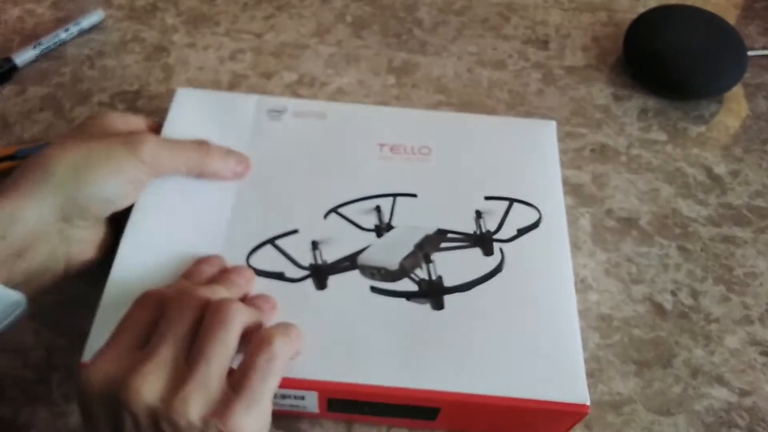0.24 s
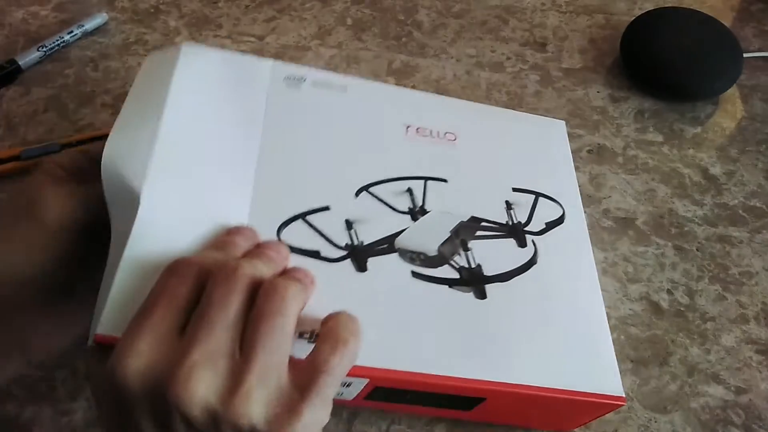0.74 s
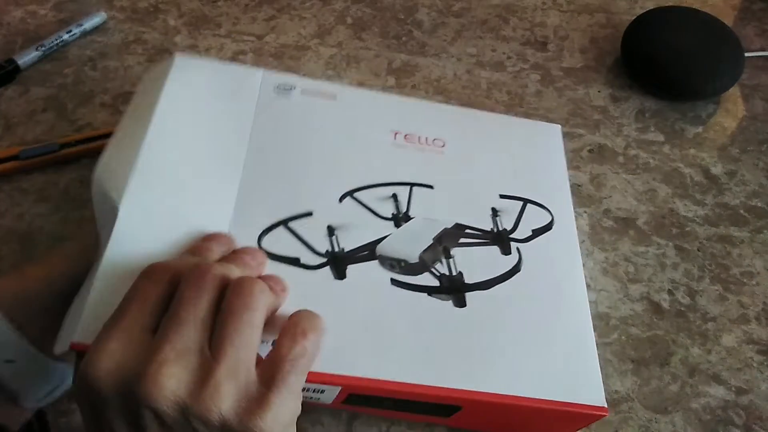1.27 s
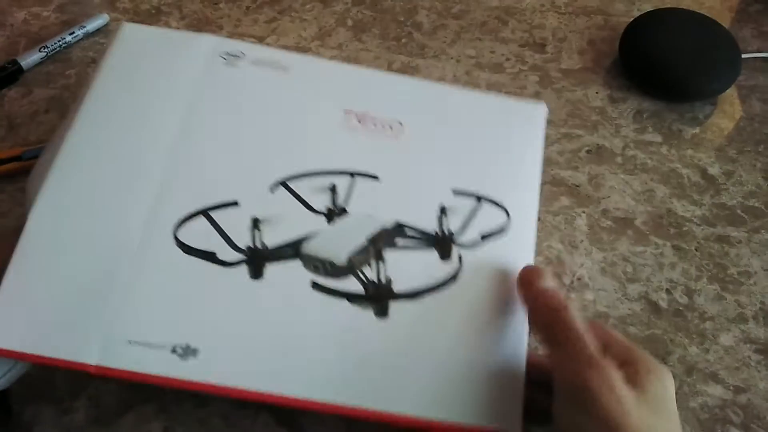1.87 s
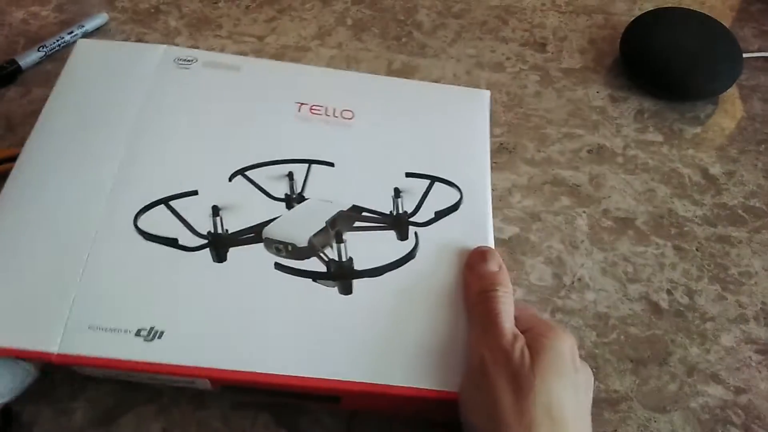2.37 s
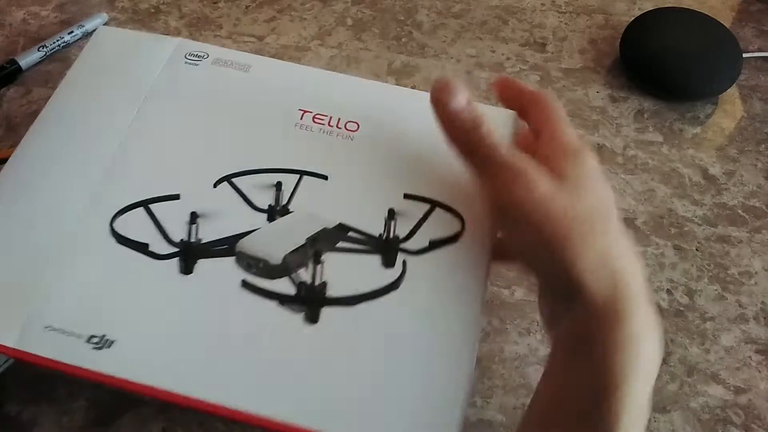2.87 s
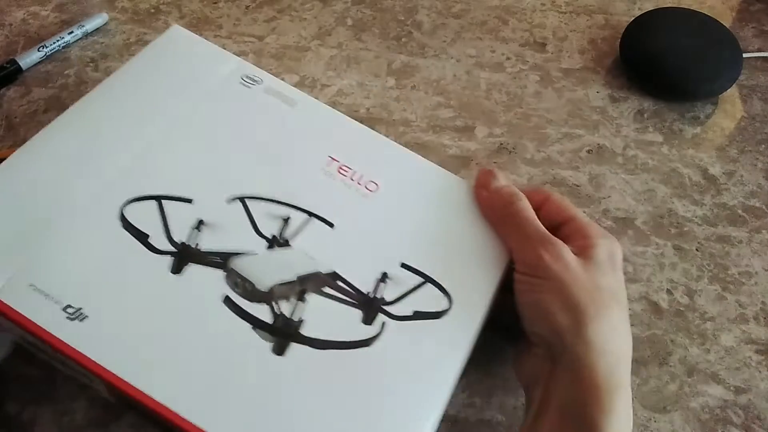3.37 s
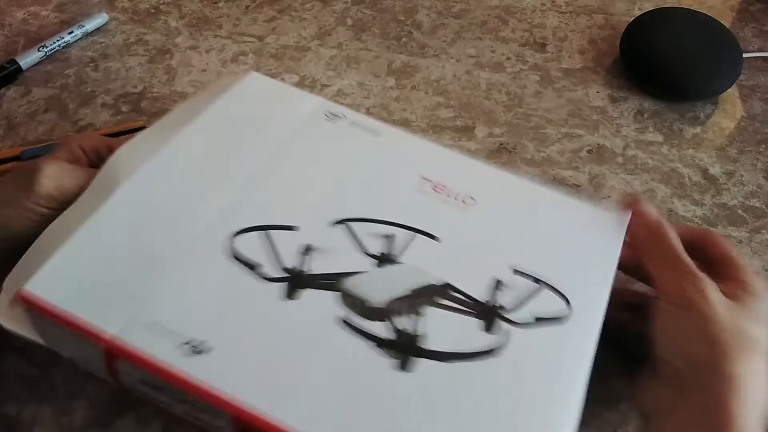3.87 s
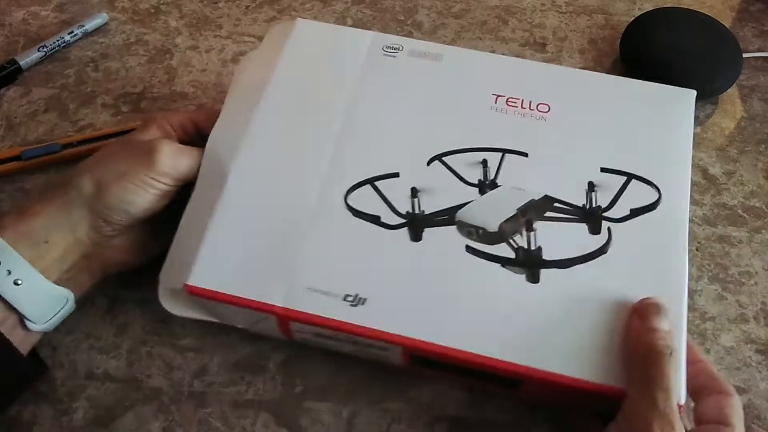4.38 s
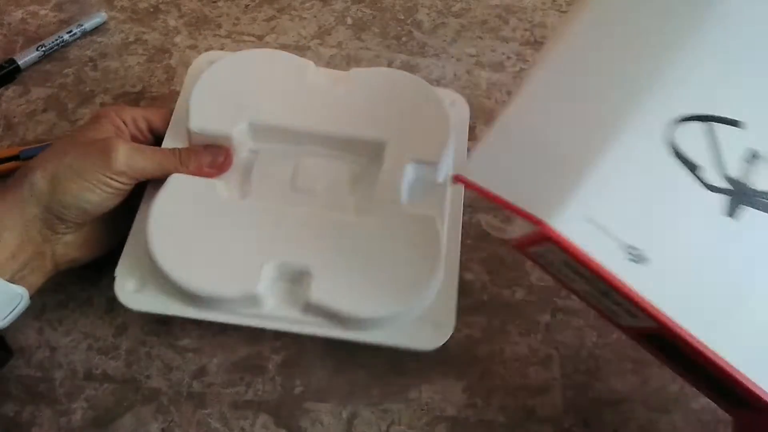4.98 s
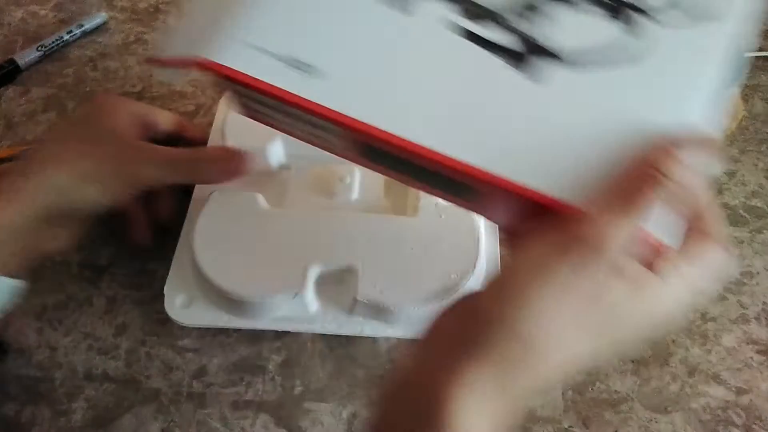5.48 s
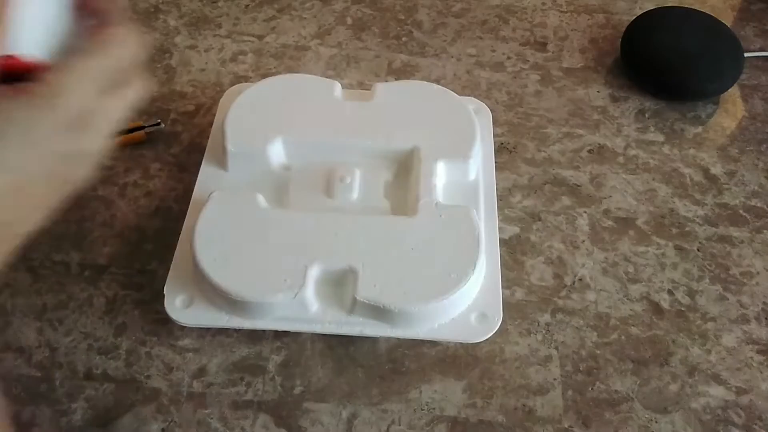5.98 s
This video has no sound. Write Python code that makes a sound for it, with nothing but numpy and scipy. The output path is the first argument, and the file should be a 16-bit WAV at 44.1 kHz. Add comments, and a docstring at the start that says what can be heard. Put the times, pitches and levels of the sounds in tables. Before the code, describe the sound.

A phone-like microphone very near catches hands working a glossy carton: light clicky taps, dry skin hiss, a bright snap, hollow thuds. The two strongest bumps come before the middle, with table rumble beneath. Later a moulded tray slides from its sleeve with grainy, resonant scraping. Soft boxy knocks and thin brushing finish it, in a small indoor room with dark, quiet gaps.

```python
"""Taps, bumps and flap snaps ring a hollow glossy cardboard box as hands open and turn it on a table.
Each blow is a set of decaying panel and air modes over a noise thud, topped by a click and a snap.
Between blows card and skin slide over card: filtered micro-slips, dragged panels, rasp and hiss.
A moulded tray is pulled out with a gliding air-gap resonance; the table rumbles into the phone close by.
A small room of sparse decaying taps surrounds it, and a noise suppressor darkens the pauses."""
import sys
import numpy as np
from scipy import signal
from scipy.fft import rfft, irfft
from scipy.io import wavfile
from scipy.ndimage import uniform_filter1d

SR = 44100
rng = np.random.default_rng(int(sys.argv[2]) if len(sys.argv) > 2 else 0)


def waveform_to_disk(signal):
    """Save audio, clipped to [-1, 1], as 16-bit WAV at the path in sys.argv[1]."""
    frames = np.transpose(np.atleast_2d(signal))
    scaled = np.clip(frames, -1, 1) * 32767
    samples = np.round(scaled).astype(np.int16)
    wavfile.write(sys.argv[1], SR, samples)


N = 275184

# Taps, bumps and flap snaps: t/s, body level/dB, struck spot f/Hz, spot level/dB,
# bass tilt/dB, treble tilt/dB (beside the middle modes), base ring time/s, click level/dB, snap level/dB
BLOWS = [(0.079, -18.5, 569, -12, -50, -1.5, 0.18, -29, -27),
         (0.099, -24.5, 748, -11, -12, 13, 0.065, -26, -30),
         (0.327, -18, 440.6, -7, -10.5, 8, 0.15, -17, -19),
         (0.571, -14.5, 256, -13, -27.5, -37, 0.17, -45.5, -65),
         (0.632, -29, 447, -21, -23, -27, 0.033, -68, -73),
         (0.841, -73.5, 231, 6.5, 28, 10, 0.096, -60, -75), (0.913, -55, 1015, -1, 1, 14.5, 0.08, -60, -58),
         (0.954, -23, 1360, -2, -17, -9, 0.067, -23, -28.5),
         (1.058, -25.5, 1364, -16, -12, 10.5, 0.17, -17, -24),
         (1.304, -28, 2080, -5.5, -30, -1.5, 0.13, -47, -38.5),
         (1.336, -18.5, 530, -7.5, -18, 2, 0.29, -17, -26),
         (1.409, -15, 1515, -9, -25, 23.5, 0.028, -12.5, -3.5),
         (1.501, -20, 180, 5, 3.5, -5, 0.11, -46, -56), (1.511, -7, 450, -6, -6, -8, 0.14, -32, -51),
         (1.678, -8, 246, -15.5, -4.5, 5, 0.077, -21.5, -31.5),
         (1.709, -30.5, 561, -15, -16, 7, 0.39, -30, -26.5), (1.902, -51.5, 345, 5, 6, 1, 0.089, -83, -88),
         (1.968, -13, 575, -11, -8, 6, 0.11, -19.5, -24.5),
         (2.109, -12.5, 998, -5.5, -7, 5, 0.083, -48, -26),
         (2.167, -15.5, 516, -4.5, -17, -9.5, 0.16, -37, -39.5),
         (2.236, -22, 541, -4.5, -39, -8, 0.096, -55, -37),
         (2.357, -28.5, 540, -13, -55, -10, 0.19, -42, -34.5),
         (2.473, -27, 928, -9, -29, 0, 0.17, -35, -37.5),
         (2.663, -23, 684, -1.5, -32, -16.5, 0.058, -53.5, -55),
         (2.727, -3, 197.4, -4.5, -11, -6, 0.12, -29, -25.5),
         (2.811, 1.5, 856, -11, -16, 0, 0.093, -18.5, -26),
         (3.028, -22, 323, 3.5, -1, -5.5, 0.047, -64.5, -32),
         (3.069, -30.5, 414, -3, -9.5, -23, 0.32, -37, -20.5),
         (3.105, -16, 693, -2, -11.5, -6, 0.047, -33, -53),
         (3.276, -44.5, 280, 2, 10, -20.5, 0.04, -70, -59),
         (3.318, -31, 1900, -15, -24, 23, 0.056, -26, -45),
         (3.514, -37, 305, 0.5, -26.5, 8, 0.084, -58, -48),
         (3.57, -28, 740, -15, -9, 11, 0.092, -25.5, -66),
         (3.615, -16.5, 725, -5.5, -8.5, -11.5, 0.21, -13, -14.5),
         (3.746, -35, 830, -3.5, -15, -10, 0.11, -46, -48.5),
         (3.847, -34, 250, -4, 7.5, -16.5, 0.12, -26, -38),
         (3.872, -10, 348, -9, -9.5, -3, 0.046, -34, -46),
         (3.917, -15.5, 430, -19, -24, -17.5, 0.1, -67.5, -42.5),
         (4.176, -55.5, 339, -6, 1.5, 2.5, 0.15, -71, -60.5),
         (4.233, -39.5, 834, 10.5, -7.5, -2, 0.15, -41.5, -39),
         (4.299, -51, 2000, -1.5, -21.5, -2, 0.1, -41, -47.5),
         (4.396, -25, 530, -6.5, -10.5, -4, 0.17, -31.5, -53),
         (4.513, -21.5, 549, 6, -0.5, -18, 0.2, -37, -35), (4.692, -18, 746.6, -3, -0.5, 6, 0.47, -26, -31),
         (4.771, -14, 553, -32, -9, -10, 0.15, -9, -14.5),
         (5.002, -19, 455, -5.5, -16.5, -25, 0.14, -73, -77.5),
         (5.012, -16.5, 562, -20, -27.5, -8, 0.11, -82, -80.5),
         (5.099, -47.5, 215, -4, 4, -24, 0.1, -60.5, -83.5),
         (5.251, -12, 563, -9, -27, -19, 0.14, -60, -47),
         (5.404, -18, 663, -16.5, -20, -12.5, 0.15, -49.5, -47),
         (5.822, -56.5, 435, 0, -20.5, -11.5, 0.17, -55.5, -39.5),
         (5.899, -42, 756, -4, 0.5, 1.5, 0.23, -62, -33), (5.923, -46, 196, -17, 6, 4, 0.13, -43, -55.5),
         (6.043, -20, 439, -5.5, -26.5, -4, 0.12, -29, -23)]
# Panels and enclosed air of the box: f/Hz, level/dB, base t60/s (scaled by how a contact damps them)
BOX_MODES = [(155, -11.5, 0.26), (218, 2.5, 0.14), (263.6, 2.5, 0.13), (283.1, -8, 0.18),
             (362.2, -4.5, 0.14), (444.4, -3.5, 0.077), (450, -12, 0.099), (538.7, 2.5, 0.047),
             (641, -2.5, 0.038), (682.6, -1.5, 0.072), (770, 3.5, 0.04), (874.4, -4.5, 0.055),
             (1022.4, -2.5, 0.086), (1172, -11, 0.12), (1259.5, 6, 0.031), (1387.4, -8.5, 0.12),
             (1445, 0, 0.042), (1643, -0.5, 0.042), (1940, -17, 0.034), (2066, -15, 0.13)]
# Spectrum of card rasp and of the click in a blow: f/Hz, relative level/dB
RASP_COLOUR = [(700, -26), (1200, -2), (1800, 3), (2600, -1.5), (4000, -5), (5500, -5), (8000, -24)]
# Spectrum of skin hiss: f/Hz, relative level/dB
HISS_COLOUR = [(3500, -17.5), (4800, -9), (5500, 3.5), (7000, 4), (8500, 5.5), (10000, -1), (11000, -8.5),
               (12500, -36)]
# Spectrum of the top octave of the hiss: f/Hz, relative level/dB
HISS_TOP_COLOUR = [(9000, -32), (10500, -10.5), (12000, -7), (13000, -10.5), (16500, -16.5)]
# Spectrum of the table's low shaking: f/Hz, relative level/dB
TABLE_COLOUR = [(20, -31.5), (35, -26.5), (50, 4.5), (70, -7.5), (125, -5), (180, -14), (260, -30.5)]
# Decay of the small room: f/Hz, t60/s
ROOM_DECAY = [(100, 0.1), (300, 0.33), (800, 0.097), (2000, 0.21), (6000, 0.11), (14000, 0.053)]
# Spectrum of the faint noise floor: f/Hz, relative level/dB
FLOOR_COLOUR = [(18, -32), (30, -6.5), (86, 2.5), (461, -11), (937, -29.5), (1460, -18.5), (3300, -30),
                (16000, -40)]
# Spectrum of the bright snap in a blow: f/Hz, relative level/dB
SNAP_SPECTRUM = [(3500, -22), (5000, -11.5), (7500, 4), (10000, -0.5), (12000, -11), (16000, -19)]
# Hands and card moving over card: full contact t/s, swell before it/s, hold/s, fade/s, dragged panels level/dB,
# their centre f/Hz, rasp level/dB, hiss level/dB, hiss top octave level/dB
STROKES = [(0.0, 0.009, 0.0056, 0.15, -39, 583, -56, -38.5, -46.5),
           (0.08, 0.14, .03, 0.083, -41, 1000, -50, -39.5, -54),
           (0.198, 0.15, 0.013, .12, -54.5, 1420, -41, -42.5, -55),
           (0.338, 0.034, 0.0071, 0.14, -28.5, 556, -36, -33, -41.5),
           (0.581, 0.088, .01, 0.15, -56, 341, -61, -50, -92),
           (0.645, 0.045, 0.045, 0.039, -73, 400, -76, -61.5, -87),
           (0.843, 0.0066, 0.018, 0.053, -59, 1290, -70.5, -73, -94),
           (0.879, .012, 0.049, .04, -62, 1000, -64, -59, -87),
           (0.972, 0.058, 0.012, 0.12, -32.5, 760, -42.5, -39.5, -53),
           (1.075, 0.022, 0.0091, 0.2, -51, 1090, -44, -60, -54),
           (1.169, 0.24, .005, 0.15, -29.5, 880, -34.5, -35, -46),
           (1.298, .015, .025, 0.036, -48.5, 900, -52, -38.5, -54.5),
           (1.358, 0.076, 0.0036, 0.088, -28, 567, -33, -35, -45),
           (1.389, .03, 0.0098, .02, -45, 640, -48.5, -38.5, -44),
           (1.411, 0.018, 0.0084, 0.16, -21.5, 413, -33, -31, -45),
           (1.522, 0.035, .005, 0.19, -23.5, 464, -61, -65, -66),
           (1.701, 0.026, 0.0065, 0.12, -30, 617, -37.5, -40, -46),
           (1.796, .03, 0.039, 0.078, -45, 786, -79, -64.5, -59),
           (1.981, 0.036, .01, 0.48, -30, 680, -42.5, -41, -50.5),
           (2.117, 0.041, .005, 0.11, -21.5, 473, -35.5, -37, -47),
           (2.233, 0.031, 0.0058, 0.11, -38.5, 570, -44, -39.5, -49),
           (2.302, 0.045, 0.087, 0.12, -60, 650, -61.5, -48.5, -49),
           (2.485, 0.037, 0.0042, 0.071, -45.5, 680, -44.5, -42.5, -57.5),
           (2.663, 0.038, 0.016, 0.028, -37.5, 700, -55, -60, -70),
           (2.691, 0.043, 0.06, .03, -52, 750, -57, -47, -55.5),
           (2.742, 0.023, 0.0076, 0.098, -14.5, 378, -42.5, -42.5, -52),
           (2.845, 0.071, .01, 0.11, -21, 590, -44.5, -46.5, -58),
           (3.019, 0.0072, 0.038, .05, -48.5, 780, -90, -48, -51.5),
           (3.09, 0.045, .005, 0.13, -32, 550, -50, -40.5, -50),
           (3.226, 0.084, 0.033, 0.3, -45.5, 990, -45.5, -39, -50.5),
           (3.338, 0.056, 0.045, 0.063, -32.5, 353, -33, -39.5, -54),
           (3.531, .02, 0.028, .05, -28, 500, -41, -39.5, -49.5),
           (3.578, 0.063, 0.047, 0.12, -27, 573, -28.5, -28.5, -42.5),
           (3.834, 0.25, .005, 0.11, -73, 814, -80, -36, -45.5),
           (3.877, 0.036, 0.0038, 0.055, -19, 450, -45, -55, -66),
           (3.945, 0.054, .005, 0.063, -41, 481, -78, -56.5, -74),
           (3.982, 0.039, 0.045, 0.35, -73, 403, -83, -75, -52),
           (4.23, 0.017, 0.022, 0.05, -60.5, 800, -80, -67, -56),
           (4.32, 0.012, 0.087, .03, -71, 762, -92, -53.5, -84),
           (4.423, 0.054, 0.0054, 0.29, -39, 770, -36.5, -35, -51),
           (4.455, .06, 0.042, .05, -22.5, 850, -26.5, -28.5, -39.5),
           (4.519, 0.088, 0.011, 0.15, -14.5, 918, -19, -22.5, -34),
           (4.698, 0.062, 0.013, .12, -15, 500, -21.5, -23, -34),
           (4.755, 0.18, 0.026, 0.15, -17, 520, -23, -34, -44),
           (5.036, 0.036, 0.0038, 0.12, -48, 550, -79, -78, -105),
           (5.173, 0.043, .14, 0.13, -71, 509, -62.5, -51.5, -56.5),
           (5.251, 0.045, .005, 0.2, -40, 620, -52.5, -54, -63),
           (5.424, 0.054, .005, .07, -40, 476, -63.5, -67.5, -59),
           (5.838, 0.032, 0.22, .05, -71.5, 400, -71, -51.5, -58.5),
           (5.926, 0.063, .005, .12, -52, 250, -56, -45, -60),
           (6.074, 0.046, .005, 0.088, -40.5, 493, -52, -42, -54.5)]
# Air gap between tray and sleeve as the tray is pulled: t/s, swell/s, hold/s, fade/s, level/dB,
# first f/Hz, last f/Hz
TRAY_PULLS = [(4.441, 0.029, 0.079, .02, -24, 760, 1290), (4.552, 0.035, 0.023, 0.076, -20.5, 590, 560),
              (4.682, 0.048, 0.035, 0.044, -23.5, 720, 723), (4.766, .04, 0.048, 0.082, -24.5, 560, 355)]
# The table shakes the phone: t/s, swell/s, hold/s, fade/s, level/dB
TABLE_SHAKES = [(0.0, .02, 0.067, 0.082, -46.5), (1.393, .08, .01, .05, -48.5),
                (1.508, .05, 0.044, .06, -35), (1.71, .06, .03, .06, -42), (2.0, .05, 0.011, .08, -61),
                (2.136, .05, .03, 0.077, -45.5), (2.448, .08, .01, 0.095, -64),
                (2.737, .04, 0.029, 0.19, -30), (3.074, .05, 0.039, 0.11, -42.5),
                (3.322, 0.082, 0.1, 0.063, -34.5), (3.61, .09, 0.028, 0.1, -45.5),
                (3.87, .05, .005, 0.057, -30), (4.545, .15, .01, 0.052, -51.5),
                (4.723, .05, 0.071, 0.057, -33), (5.93, .08, 0.021, .12, -51)]

FLOOR_DB, STILL_DB = -85, -82.5  # noise floor; rumble between the shakes
EDGE_HZ = 16100  # upper band limit
SPAN_DB = 30  # a swell or fade covers this many dB in its listed time
RASP_FADE, HISS_FADE, TOP_FADE = 1.09, 0.96, 1  # fade speed beside that of the dragged panels
HARD_DB, QUICKER = -14.5, 1.7  # blows whose snap passes this level rise faster by this factor


def amp(db):
    """Gain of a level in dB."""
    return np.exp(np.asarray(db) * (np.log(10) / 20))


def evened(x):
    """Scaled to rms 1."""
    return x / np.sqrt(np.mean(x ** 2) + 1e-20)


def read(points, hz):
    """Value of a (Hz, value) table on a log-frequency axis."""
    f, value = np.transpose(points)
    return np.interp(np.log(hz + 1), np.log(f + 1), value)


def coloured(x, colour):
    """Filters by a (Hz, dB) spectrum that falls away outside its points; rms 1."""
    hz = np.fft.rfftfreq(len(x), 1 / SR)
    points = [(0, -97.5)] + list(colour) + [(SR, -90)]
    return evened(irfft(rfft(x) * amp(read(points, hz)), len(x)))


def sampled(x):
    """From milliseconds to samples."""
    return np.interp(np.arange(N) / SR, np.arange(len(x)) / 1000, x)


def envelope(rows, level_db, fade_speed=1.):
    """Power of each (t, swell, hold, fade) row once a millisecond, with straight slopes in dB."""
    s, swell, hold, fade = np.maximum(np.asarray(rows)[:, :4], 1e-3).T[:, :, None]
    t = np.arange(0, N / SR, .001)
    before = np.maximum((s - t) / swell, 0)
    after = np.maximum((t - s - hold) / fade, 0)
    drop = before + fade_speed * after
    return amp(np.asarray(level_db)[:, None] - SPAN_DB * np.minimum(drop, 8)) ** 2


def contact(column, fade_speed=1.):
    """Gain of one layer of the rubbing, the powers of all movements added."""
    level_db = np.asarray(STROKES)[:, column]
    return sampled(np.sqrt(envelope(STROKES, level_db, fade_speed).sum(0)))


def slips(per_s, spread_db, smooth):
    """Friction: uneven micro-slips, a few of them large, over a smooth rush."""
    chance, sign = rng.random((2, N))
    size = amp(spread_db * np.minimum(rng.exponential(1, N), 3.))
    hits = size * (chance < per_s / SR) * np.sign(sign - .5)
    return evened(hits) + smooth * rng.standard_normal(N)


def flutter(per_s, depth_db):
    """Contact pressure wavers at random: twice-smoothed noise as a gain in dB."""
    width = int(SR / per_s)
    waver = uniform_filter1d(uniform_filter1d(rng.standard_normal(N), width), width)
    return amp(depth_db * evened(waver))


def noise_floor():
    """Faint steady noise with its own spectrum."""
    return amp(FLOOR_DB) * coloured(rng.standard_normal(N), FLOOR_COLOUR)


def rumble():
    """Low shaking carried by the table: bass noise that swells with each shake."""
    power = envelope(TABLE_SHAKES, np.asarray(TABLE_SHAKES)[:, 4]).sum(0) + amp(STILL_DB) ** 2
    return sampled(np.sqrt(power)) * coloured(rng.standard_normal(N), TABLE_COLOUR)


def room(x):
    """Small-room tail: sparse taps of random sign, each band dying at its own speed."""
    taps = np.zeros(SR // 2)
    at = np.arange(200, SR // 2 - 20, 20)
    taps[at + rng.integers(0, 20, len(at))] = rng.choice([-1., 1.], len(at))
    hz, t, z = signal.stft(taps, SR, nperseg=256)
    fade = amp(-60 * t / read(ROOM_DECAY, hz)[:, None])
    tail = signal.istft(z * fade, SR, nperseg=256)[1]
    return signal.fftconvolve(x, tail / np.linalg.norm(tail))[:N]


def stroke():
    """Fine hiss of fingers and flaps over the coated surface: dense, even slips."""
    rush = slips(6000.0, 1.0, 0.95) * flutter(81.0, 1.2)
    top = contact(column=8, fade_speed=TOP_FADE) * coloured(rush, HISS_TOP_COLOUR)
    return contact(column=7, fade_speed=HISS_FADE) * coloured(rush, HISS_COLOUR) + top


def scrape():
    """Grainy rasp of card on card: slips through a midrange-to-treble colour."""
    grain = coloured(slips(3500.0, 2.1, 1.6), RASP_COLOUR)
    return contact(column=6, fade_speed=RASP_FADE) * grain * flutter(51.0, 2.3)


def gap():
    """Slips of the tray pass an air-gap resonance that glides with the opening."""
    glide = [[(s, first), (s + hold, last)] for s, _, hold, _, _, first, last in TRAY_PULLS]
    times, hz = np.reshape(glide, (-1, 2)).T
    glide_hz = np.interp(np.arange(N) / SR, times, hz)
    turn = np.exp(2j * np.pi * np.cumsum(glide_hz) / SR)
    r = np.exp(-np.pi * 230. / SR)  # each pole is 230 Hz wide
    # shift the resonance down to zero, low-pass there, then shift back
    smooth = signal.lfilter([1], np.convolve([1, -r], [1, -r]), slips(890.0, 1.4, 1.0) / turn)
    level = sampled(np.sqrt(envelope(TRAY_PULLS, np.asarray(TRAY_PULLS)[:, 4]).sum(0)))
    return level * flutter(90., 1.2) * evened((turn * smooth).real)


def centre():
    """Pitch of the dragged panels: a power-weighted mean, so the loudest movement leads."""
    power = envelope(STROKES, np.asarray(STROKES)[:, 4])
    log_hz = np.log(np.asarray(STROKES)[:, 5:6])
    return sampled(np.exp((power * log_hz).sum(0) / power.sum(0)))


def near(hz, centre_hz, octaves):
    """How strongly a contact tuned to one pitch drives a mode."""
    return np.exp(-.5 * (np.log2(hz / centre_hz) / octaves) ** 2)


def drag():
    """Slips shake the panels: the modes near the moving centre ring most."""
    push = coloured(slips(1500., 3.6, 0.92), [(100, -14), (200, -3), (1800, 5.5), (3000, -16.5)])
    centre_hz = centre()
    out, power = np.zeros((2, N))
    for hz, db, t60 in BOX_MODES:
        r = amp(-60 / (0.33 * t60 * SR))  # damped by the hands
        poles = [1, -2 * r * np.cos(2 * np.pi * hz / SR), r * r]
        once = signal.lfilter([1, 0, -1], poles, push)
        ring = signal.lfilter([1, 0, -1], poles, once)  # a second pass keeps it dark between modes
        weight = amp(db) * (near(hz, centre_hz, 0.7) + 0.09)
        out += weight * evened(ring)
        power += weight ** 2
    return contact(column=4) * flutter(60, 2.5) * out / np.sqrt(power)


def knocks():
    """Each blow rings the box by its own balance and thuds between the modes, under a click and snap."""
    out, t = np.zeros(N + 12288), np.arange(12288) / SR
    hz, db, t60 = np.transpose(BOX_MODES)[:, :, None]
    bins = np.fft.rfftfreq(len(t), 1 / SR) + 1
    small = signal.butter(2, 100., "high", fs=SR, output="sos")  # the blows carry no deep bass
    chance = rng.random((len(BLOWS), 3, len(BOX_MODES), 1))
    for row, (phase, share, shift) in zip(BLOWS, chance):
        s, level_db, spot_hz, spot_db, low_db, high_db, ring, click_db, snap_db = row
        ring = max(ring, .02)
        balance = [(60, low_db - 34.0), (150, low_db - 8.5), (250, low_db + 2), (600, 0),
                   (1300, high_db - 4), (2200, high_db - 13.5), (4000, high_db - 42.5)]  # (Hz, dB)

        weight = amp(db + read(balance, hz) + 10.2 * share)
        fade = amp(-60 * t / (t60 * ring / 0.18))
        mode_hz = hz * (1 + .04 * (shift - .5))
        # one blow starts the modes nearly together
        modes = weight * fade * np.sin(2 * np.pi * (mode_hz * t + .4 * phase))

        thud, click, snap = rng.standard_normal((3, len(t)))
        thud = irfft(rfft(thud) * amp(read(balance, bins)) / np.sqrt(bins / 600))
        thud *= amp(-60 * t / (0.76 * ring))
        spot_gain = amp(spot_db + max(low_db, 0, high_db) - 60 * t / (0.63 * ring))
        spot = spot_gain * np.sin(2 * np.pi * spot_hz * t)

        quick = QUICKER if snap_db > HARD_DB else 1
        body = spot + 0.32 * modes.sum(0) + 1.1 * thud
        body *= 0.87 + 0.72 * np.exp(-t / 0.025)  # extra weight at first, soon settled
        body *= (1 - np.exp(-quick * t / 0.0018)) ** 2
        burst = 1.0 * np.exp(-t / 0.0036) + 0.12 * np.exp(-t / .02)
        burst *= 1 - np.exp(-quick * t / 0.002)
        top = amp(click_db) * coloured(click, RASP_COLOUR) + amp(snap_db) * coloured(snap, SNAP_SPECTRUM)
        at = round(s * SR)
        out[at:at + len(t)] += amp(level_db) * signal.sosfilt(small, body) + top * burst
    return out[:N]


def scene():
    """Blows and rubbing in a small room, over table rumble and a faint floor."""
    blows = knocks()
    rubbing = drag() + gap() + scrape() + stroke()
    reverb = amp(-11.5) * room(blows + 0.39 * rubbing)
    return (blows + rubbing + reverb + rumble() + noise_floor())[None]


def record(dry):
    """Phone pickup: bass loss, a suppressor that turns down weak bands, clipping and the band limit."""
    bass_cut = signal.butter(3, 36., "high", fs=SR, output="sos")
    hz, t, z = signal.stft(signal.sosfilt(bass_cut, dry[0]), SR, nperseg=512, noverlap=384)
    # power smoothed over neighbouring bands, then over time
    power = uniform_filter1d(uniform_filter1d(abs(z) ** 2, size=15, axis=0), size=5, axis=1)
    open_share = power / (power + amp(-96.0) ** 2)  # half open at the threshold
    gain = amp(-17.0) + (1 - amp(-11.5)) * open_share
    gated = signal.istft(z * gain, SR, nperseg=512, noverlap=384)[1][:N]
    band_limit = signal.firwin(511, EDGE_HZ, window=("kaiser", 9), fs=SR)
    return signal.oaconvolve(np.clip(gated, -1, 1), band_limit, "same")[None]


dry = scene()
out = record(dry)
waveform_to_disk(out)
```